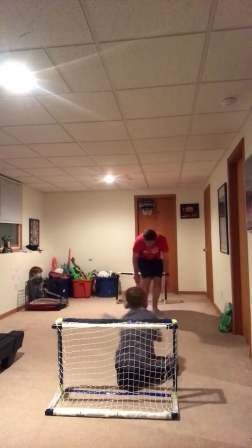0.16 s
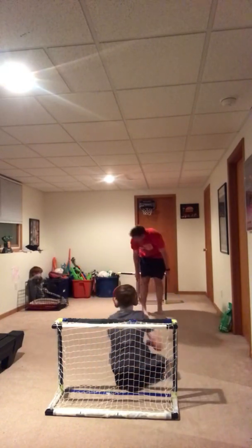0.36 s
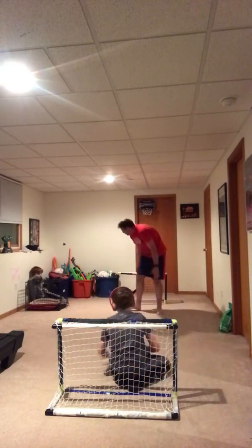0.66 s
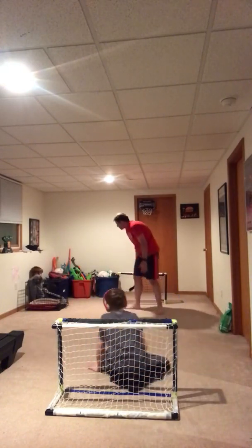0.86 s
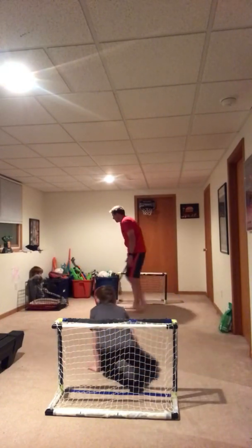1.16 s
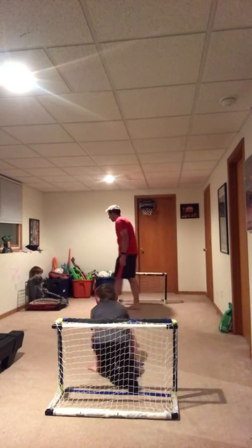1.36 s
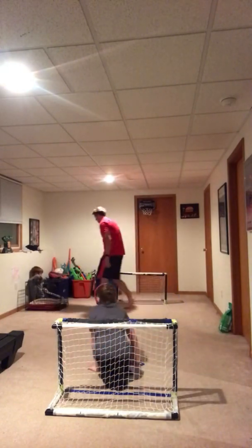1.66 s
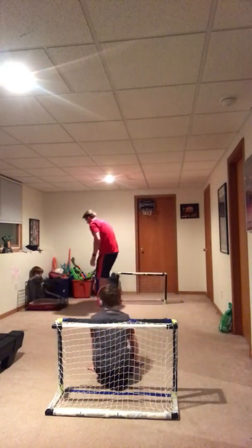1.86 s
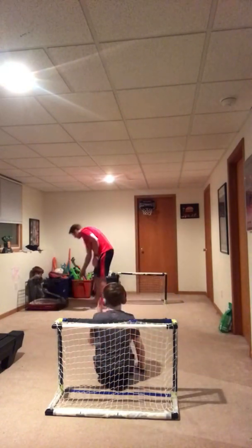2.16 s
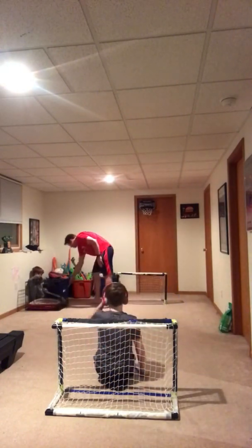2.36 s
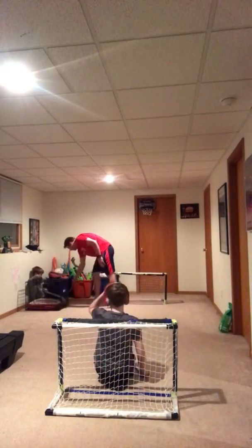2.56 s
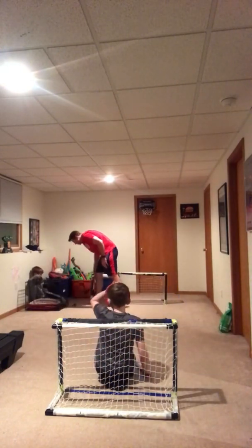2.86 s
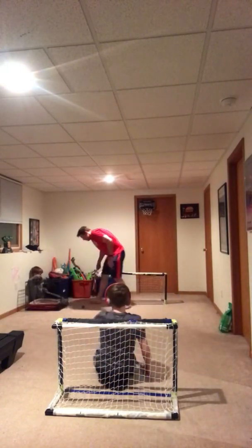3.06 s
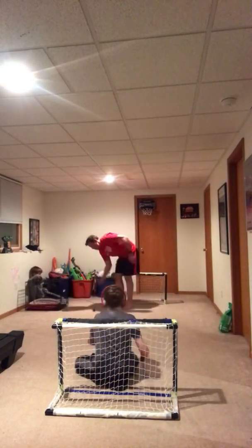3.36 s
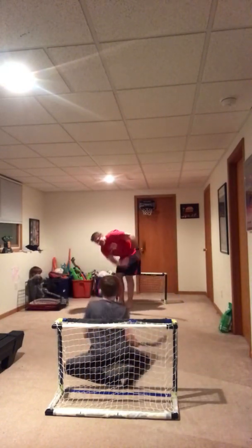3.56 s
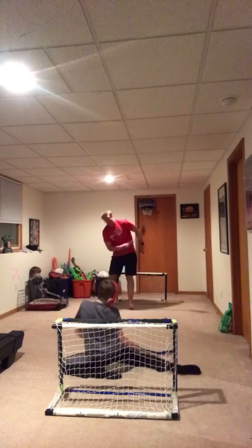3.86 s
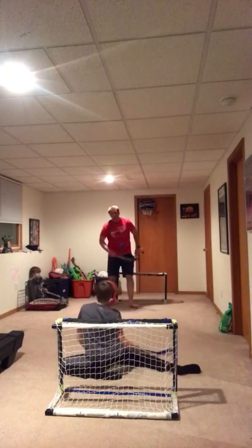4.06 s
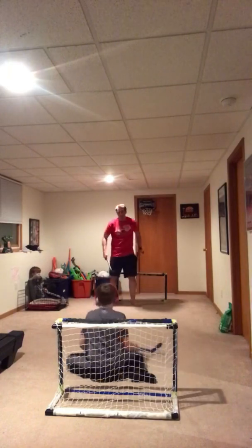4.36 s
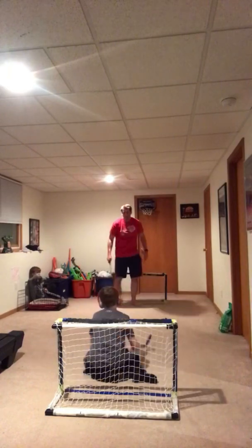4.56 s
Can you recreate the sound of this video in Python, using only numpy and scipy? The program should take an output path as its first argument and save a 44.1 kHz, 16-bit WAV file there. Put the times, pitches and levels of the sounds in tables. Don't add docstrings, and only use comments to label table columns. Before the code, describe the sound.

Over a low furnace hum, small sticks clack and knock a ball in a carpeted basement, with one very loud double crack late on.

```python
import sys
import numpy as np
from scipy import signal
from scipy.fft import rfft, irfft
from scipy.io import wavfile
from scipy.ndimage import uniform_filter1d

SR = 44100
rng = np.random.default_rng(int(sys.argv[2]) if len(sys.argv) > 2 else 0)


def elevation(decibels):
    levels = np.asarray(decibels, float)
    return 10 ** (levels / 20)


def digitize_waveform(pressure):
    field = np.atleast_2d(pressure).T
    bounded = np.clip(field, -1, 1)
    quanta = np.round(bounded * 32767).astype(np.int16)
    wavfile.write(sys.argv[1], SR, quanta)


N = 207314


def on_log(table, hz):
    f, v = np.transpose(table)
    return np.interp(np.log(np.maximum(hz, 1)), np.log(f), v)


def shaped(x, gain):
    return irfft(rfft(x) * gain(np.fft.rfftfreq(len(x), 1 / SR)), len(x))


def band(hz, width, size=N):
    x = shaped(rng.standard_normal(size), lambda f: np.exp(-((f - hz) / width) ** 2))
    return x / np.std(x)


def walk(rate):
    k = int(SR / rate)
    steps = np.repeat(rng.standard_normal(N // k + 1), k)
    return uniform_filter1d(uniform_filter1d(steps, k), k)[:N]


def ring(hz, t60, size=16384):
    t = np.arange(size) / SR
    return np.sin(2 * np.pi * hz * t) * 1000. ** (-t / np.maximum(t60, .002))


def add(track, s, sound):
    i = int(s * SR)
    track[i:i + len(sound)] += sound[:N - i]


def furnace():
    # frequency in Hz, level in dB per Hz.
    air_colour = [(30, -52), (45, -8.5), (85, 1.5), (150, -13), (200, -0.5), (300, -9.5), (450, -19),
                  (750, -31), (1150, -27), (1900, -33.5), (4000, -38), (8000, -42), (16000, -45)]
    # frequency in Hz, line in dB rms, noisy skirt in dB rms, skirt width in Hz.
    fan_lines = [(54.85, -48.5, -60, 3.7), (119.4, -58.5, -93.5, 5.2), (214, -55.5, -60.5, 9.2),
                 (600, -102, -75.5, 64), (1109, -78, -81, 110)]
    air_db, flicker_db = -51.5, 1.5
    ease_db_per_s = -0.76
    t = np.arange(N) / SR
    air = 0
    for hz in 25 * 2 ** np.arange(0, 9.6, .25):
        level = elevation(on_log(air_colour, hz) + flicker_db * walk(6.25))
        air = air + level * np.sqrt(hz) * band(hz, hz / 7)
    lines = 0
    for hz, db, skirt_db, width in fan_lines:
        tone = elevation(db) * np.sqrt(2) * np.sin(2 * np.pi * hz * t)
        lines = lines + tone + elevation(skirt_db) * band(hz, width)
    return elevation(air_db) * air / np.std(air) + elevation(ease_db_per_s * t) * lines


def brush():
    # start in seconds, length in seconds, level in dB, brightness in dB.
    strokes = [(0.99, 0.29, -69.5, 4.5), (1.163, 0.43, -67, 4.5), (1.8, 0.26, -74.5, 1.5),
               (2.175, 0.65, -69.5, -1), (2.804, 0.55, -70, -5), (3.067, 0.22, -66.5, 4),
               (3.221, 0.17, -58.5, 2), (3.353, 0.22, -54, 0), (3.522, 0.44, -55, -2),
               (3.947, 0.24, -69.5, 1), (4.081, 0.35, -57, -1), (4.348, 0.16, -75, 9.5),
               (4.47, 0.33, -74.5, 12.5)]
    rise, fall = 0.31, 0.49
    hiss_db, sheen_db, sheen_per_bright = -5.5, -17.5, 1.77
    carpet_cut_hz = 744
    t = np.arange(N) / SR
    grain = elevation(1.8 * walk(60) + .8 * walk(22))
    body = band(1300, 1100) * grain
    hiss = band(3650, 4550) * grain
    sheen = band(11000, 3500) * grain
    body = shaped(body, lambda f: 1 / np.sqrt(1 + (carpet_cut_hz / (f + 1)) ** 22.0))
    out = 0
    for s, length, db, bright_db in strokes:
        along = (t - s) / length
        ramp = np.clip(np.minimum(along / rise, (1 - along) / fall), 0, 1)
        press = np.sin(np.pi / 2 * ramp) ** 2
        rustle = body + elevation(hiss_db + bright_db) * hiss
        rustle = rustle + elevation(sheen_db + sheen_per_bright * bright_db) * sheen
        out = out + press * elevation(db) * rustle
    return out


def tail():
    # frequency in Hz, decay time t60 in seconds.
    decay = [(100, 0.23), (300, 0.43), (1000, 0.18), (4000, 0.28), (14000, 0.18)]
    # frequency in Hz, level in dB.
    wetness = [(100, 2.5), (400, 9), (1500, 11), (6000, 1), (14000, 5.5)]
    build_s = 0.0015
    grain_db, grain_s = 4.5, 0.032
    t = np.arange(16384) / SR
    uneven = np.repeat(rng.standard_normal(len(t) // 64), 64) * np.exp(-t / grain_s)
    noise = rng.standard_normal(len(t)) * elevation(grain_db * uneven)
    reply = 0
    for hz in 50 * 2 ** np.arange(0, 8.6, .5):
        fall = 1000. ** (-t / on_log(decay, hz)) * (1 - np.exp(-t / build_s))
        part = shaped(noise, lambda f: np.cos(
            np.pi * np.clip(np.log2(np.maximum(f, 1) / hz), -.5, .5)) ** 2)
        reply = reply + elevation(on_log(wetness, hz)) * part * fall / np.linalg.norm(fall)
    return reply


def room():
    # delay in seconds, level in dB.
    echoes = [(.0022, 5.5), (.0055, -4), (.011, -23.5), (.016, -5.5), (.024, -8.5)]
    near_db = 3.5
    reply = tail() * elevation(-near_db)
    reply[0] += 1
    for k, (s, db) in enumerate(echoes):
        reply[int(s * SR)] += elevation(db) * (-1) ** k
    return reply


def tube():
    # frequency in Hz, level in dB, decay time t60 in seconds.
    tube_modes = [(6580, -5, .08), (7160, -8, .08), (8300, -5, .1), (8690, 0, .16), (9940, -5, .08),
                  (10630, -5, .08), (11850, 0, .1), (12500, -1, .15), (13700, -1, .06)]
    # time in seconds, level in dB.
    rattles = [
        (.979, -69),
        (.992, -70),
        (1.010, -68),
        (1.045, -73),
    ]
    scatter_db = 3
    out = np.zeros(N)
    for s, db in rattles:
        chime = 0
        for hz, m, t60 in tube_modes:
            chime = chime + elevation(m + scatter_db * rng.standard_normal()) * ring(hz, t60)
        add(out, s, elevation(db) * chime)
    return out


def thumps():
    # time in seconds, peak
    # in dB, struck near Hz, spread in octaves, contact in ms.
    blows = [(.305, -29, 534, 0.26, 8.3), (.326, -28.5, 320, 0.28, 7.3), (.316, -23.5, 569, .06, 8.8),
             (.780, -44, 320, 0.29, 4.3), (.785, -41, 514, 0.18, 5.5), (.972, -37.5, 450, 0.61, 6.5),
             (0.989, -42.5, 460, 0.35, 5.3), (1.343, -26.5, 149, .4, 2.8), (1.348, -28, 320, .6, 9),
             (1.375, -36.5, 500, 0.25, 7), (1.399, -37.5, 407, 0.3, 6.4), (1.430, -32, 326, 0.3, 10.5),
             (1.472, -42.5, 480, .3, 4.1), (3.419, -35.5, 1200, 0.65, 11), (3.434, -25.5, 324, 0.43, 4.7),
             (3.449, -22.5, 304, 0.14, 5), (3.438, -26.5, 620, 0.31, 3.8), (3.546, -35, 278, 0.23, 4.8),
             (3.547, -29.5, 646, .3, 8.8), (3.569, -35.5, 600, 0.21, 2.4), (4.370, -48, 433, 0.14, 9.4),
             (4.443, -37.5, 322, 0.58, 4), (4.445, -37, 563, 0.21, 12), (4.470, -38.5, 426, 0.11, 4.7)]
    # frequency in Hz, level in dB, decay time t60 in seconds.
    floor_modes = [(143.4, 7, 0.091), (210, -23, 0.045), (248.5, -2, 0.24), (290.6, 3, 0.083),
                   (320, 0, 0.04), (390, 3.3, 0.056), (455.2, 1, 0.069), (484.6, -10.5, 0.058),
                   (581.3, 1.5, 0.038), (696, -5, 0.047), (1100, 11, .06), (1593, 12, .054)]
    out = np.zeros(N)
    for s, db, near_hz, octaves, ms in blows:
        swell = np.clip(np.arange(16384) / SR / (max(ms, .3) / 1000), 0, 1)
        boom = 0
        for hz, m, t60 in floor_modes:
            away = np.log2(hz / near_hz) / max(octaves, .03)
            boom = boom + elevation(m - 7.3 * away ** 2) * ring(hz, t60)
        add(out, s, elevation(db - 4) * boom * np.sin(np.pi / 2 * swell) ** 2)
    return out


def clacks():
    # time in seconds, peak in dB, ring over crack in dB,
    # crack tilt in dB per octave, crack length in ms.
    contacts = [(.3035, -30.5, -16, 3, 7.4), (.3070, -28, -9, -1, 4.4), (.9720, -40.5, -28, -1.5, 4.7),
                (0.982, -41, -30, 13.5, 60), (.976, -50, -26, 8, 30), (1.351, -48.5, -12, -7.5, 20),
                (3.433, -7.5, -15, -7, 0.48), (3.4340, -6.5, 1.5, 4.5, 2.7), (3.4357, -20, -15, 10, 2.8),
                (3.448, -17, -9, -11, 2.3), (3.5430, -19.5, 8, -2, 0.86), (3.548, -21.5, -18, 0, 3.2),
                (3.5590, -33, -23, -5, 0.61), (3.5680, -25.5, -14, -8.5, 0.97), (3.61, -43, 1, 2, 2.4),
                (4.0, -58, 5, 3, 3.4), (4.446, -39, 1.5, -43, 3.3), (4.520, -51, -26, 6, 23)]
    # frequency in Hz, level in dB, decay time t60 in seconds.
    stick_modes = [(900, -33, 0.013), (1096, 10.5, 0.015), (1230, 13, 0.0062), (1470, -2, 0.028),
                   (1610, -38, 0.014), (3660, -6.5, 0.02), (5700, -33, .004)]
    # frequency in Hz, level in dB per Hz.
    crack_colour = [(200, -11), (400, -6), (1100, -7.5), (1700, -11.5), (2300, -11), (3700, -10),
                    (6200, -11), (9000, -19.5), (13000, -24), (16000, -33)]
    wet_db, wetter_db_per_db, near_db = -4, 0.1713, -10.5
    lead = 128
    rings, cracks, t = np.zeros(N), np.zeros(N), np.arange(4096) / SR
    for s, db, ring_db, tilt_db, ms in contacts:
        room_db = wet_db + wetter_db_per_db * (near_db - db)
        mix = rng.standard_normal((len(stick_modes), 2))
        body = 0
        for (hz, m, t60), (a, b) in zip(stick_modes, mix):
            body = body + elevation(m + 2 * a) * ring(hz * (1 + 0.022 * b), t60, size=len(t))
        add(rings, s, elevation(db - 11.0 + ring_db) * body / np.abs(body).max())

        colour = lambda f: elevation(on_log(crack_colour, f) + tilt_db * np.log2(1 + f / 1000))
        burst = np.roll(rng.standard_normal(len(t)) * np.exp(-1000 * t / max(ms, .05)), lead)
        crack = shaped(burst, colour)[lead:]
        size = elevation(db - 5.5) / np.abs(crack).max()
        add(cracks, s, size * crack)
        reply = shaped(tail(), colour)[:-2048]
        add(cracks, s, size * elevation(room_db) * np.linalg.norm(burst) * reply)
    return rings, cracks


def scene():
    # time in seconds,
    # level in dB.
    gain_drift = [(0, -50), (.4, -49), (1.45, -49), (1.7, -50.5), (2.3, -48.5), (2.42, -52), (4.36, -52),
                  (4.46, -47), (4.7, -50.5)]
    s, db = np.transpose(gain_drift)
    gain = elevation(np.interp(np.arange(N) / SR, s, db + 50.5))
    rings, cracks = clacks()
    hits = cracks + signal.fftconvolve(rings + thumps() + tube(), room())[:N]
    return (hits + brush() + gain * furnace())[None]


def low_pass(x):
    return signal.sosfilt(signal.butter(12, 16450, fs=SR, output="sos"), x)


def record(dry):
    # frequency in Hz, width in Hz, level in dB.
    standing = [(500, 18, -2), (582, 84, 3.5), (784, 40, 0), (890, 46, -1)]
    # frequency in Hz, width in Hz, level in dB.
    port = [(5050, 350, -2.5), (6600, 1200, 2.5), (10500, 450, -4)]
    top_hz = 15750

    def response(f):
        db_sum = sum(db * np.exp(-((f - hz) / width) ** 2) for hz, width, db in standing + port)
        return elevation(db_sum) * np.clip((top_hz - f) / 250 + 1, .004, 1) ** 2

    x = signal.sosfilt(signal.butter(4, 44, "high", fs=SR, output="sos"), dry)
    x = shaped(x[0], response)[None]
    return low_pass(x)


dry = scene()
out = record(dry)
digitize_waveform(out)
```